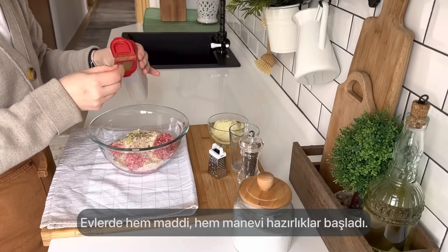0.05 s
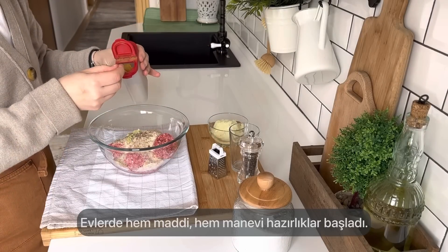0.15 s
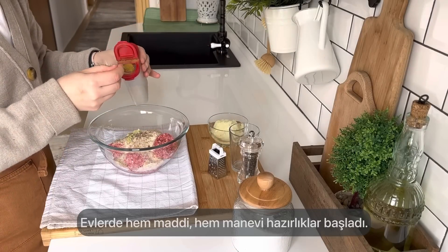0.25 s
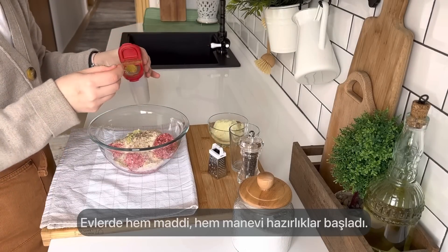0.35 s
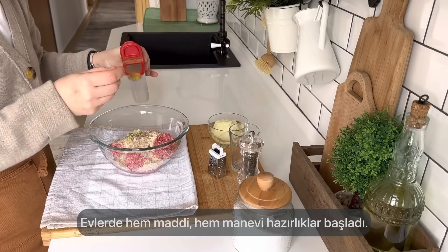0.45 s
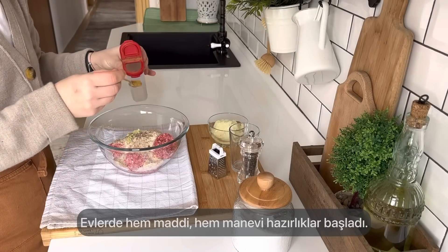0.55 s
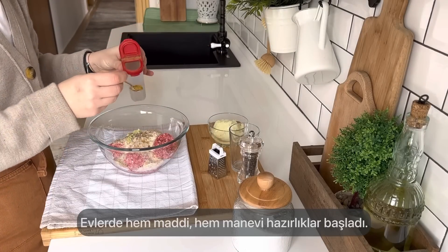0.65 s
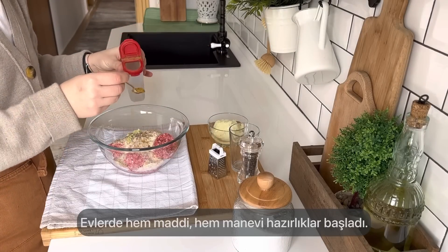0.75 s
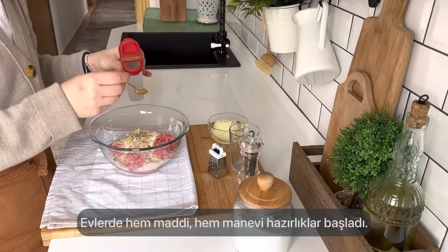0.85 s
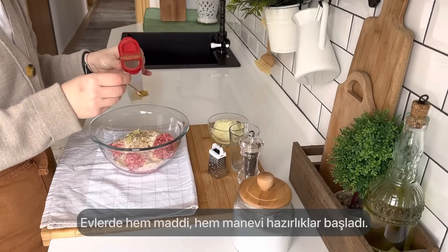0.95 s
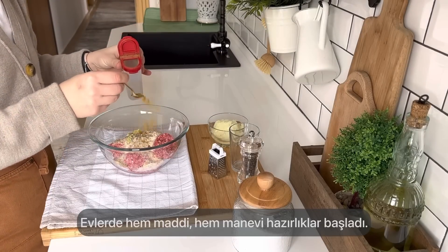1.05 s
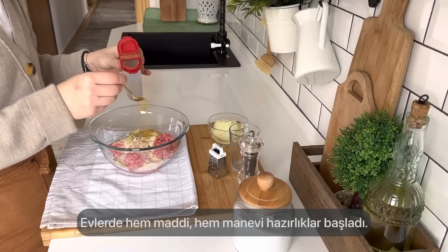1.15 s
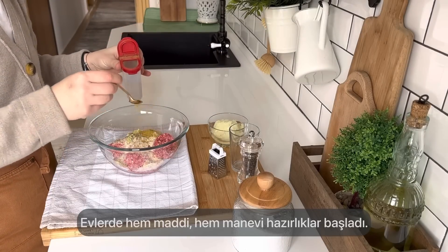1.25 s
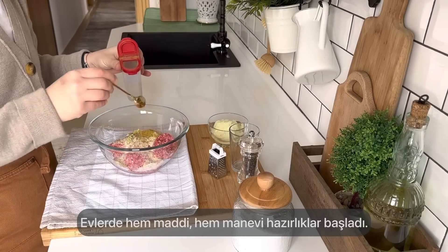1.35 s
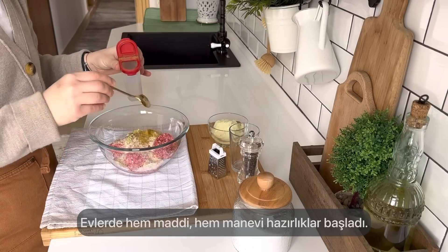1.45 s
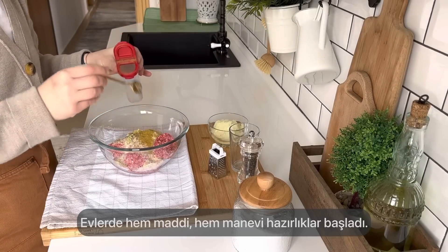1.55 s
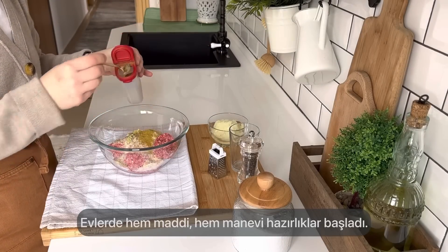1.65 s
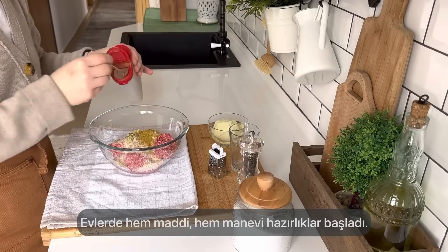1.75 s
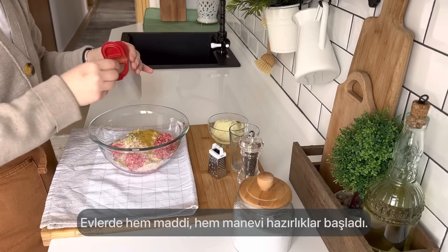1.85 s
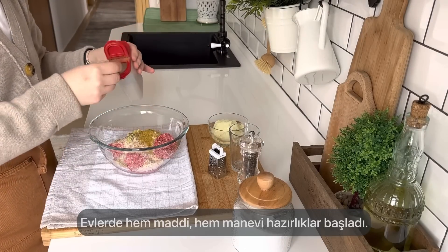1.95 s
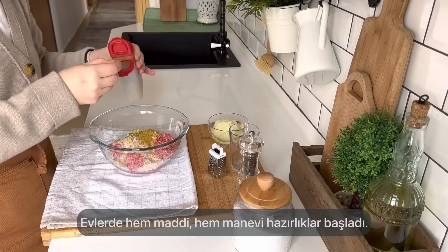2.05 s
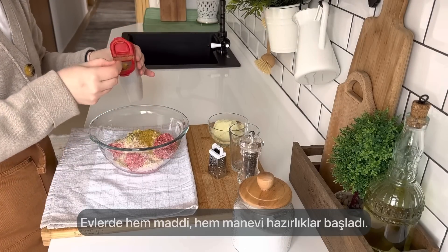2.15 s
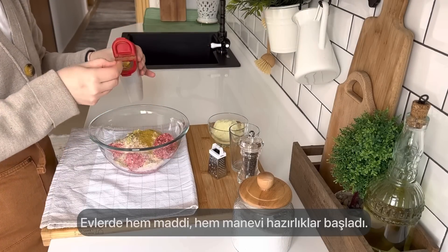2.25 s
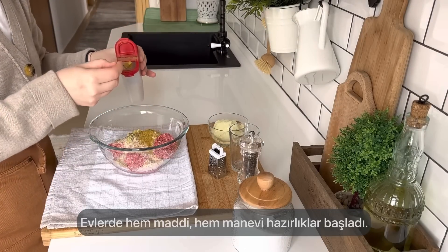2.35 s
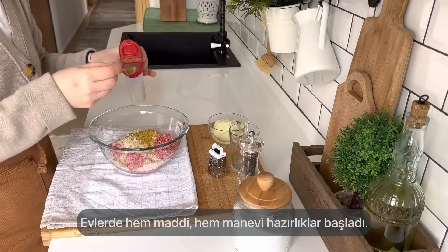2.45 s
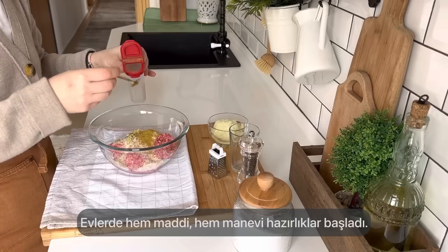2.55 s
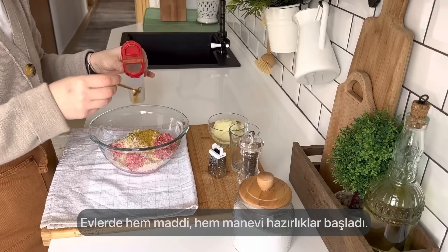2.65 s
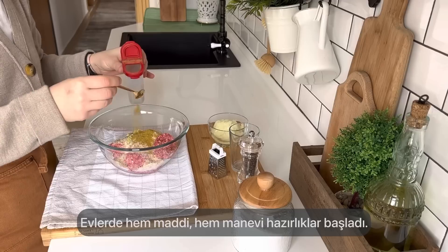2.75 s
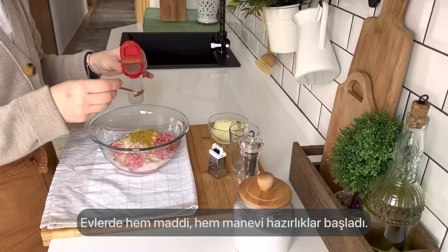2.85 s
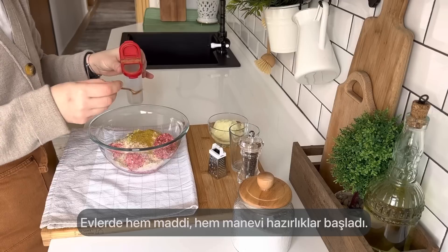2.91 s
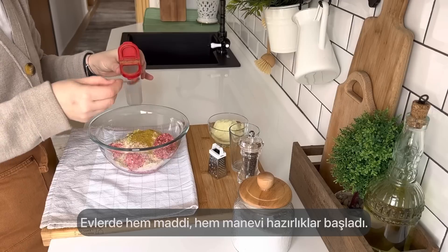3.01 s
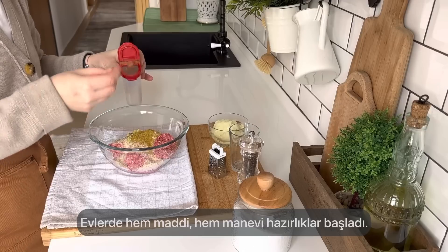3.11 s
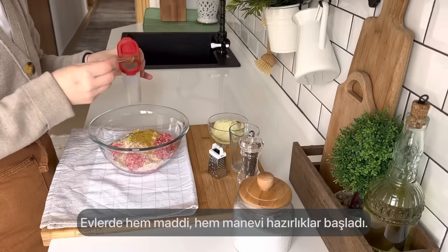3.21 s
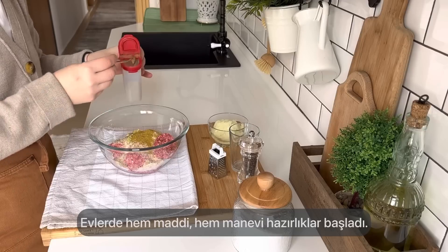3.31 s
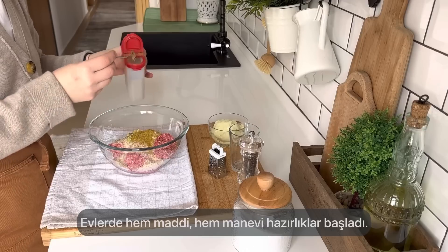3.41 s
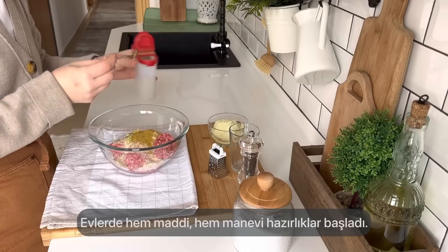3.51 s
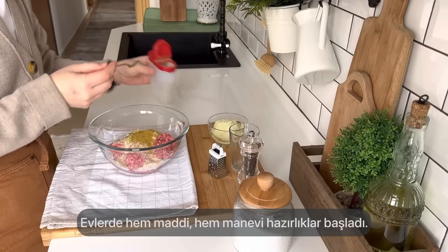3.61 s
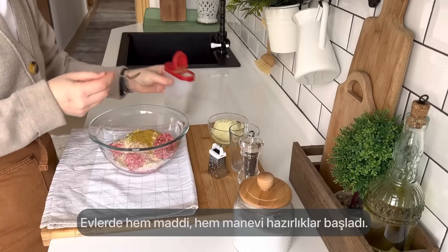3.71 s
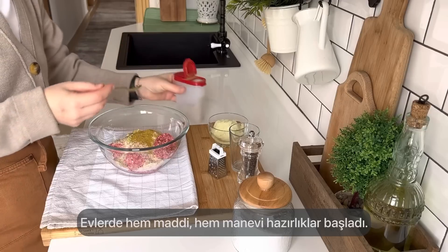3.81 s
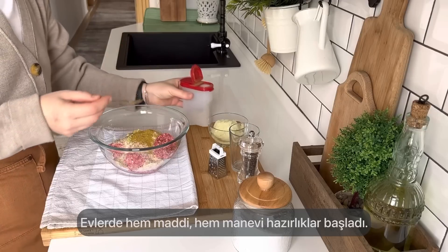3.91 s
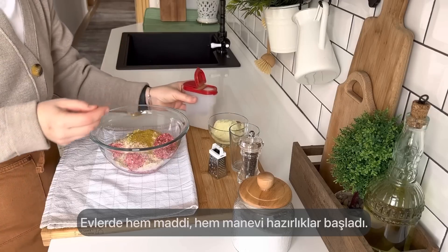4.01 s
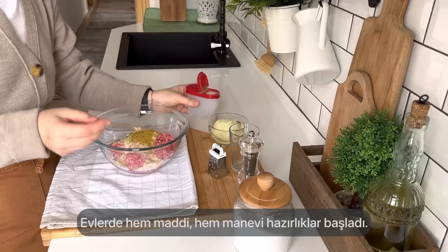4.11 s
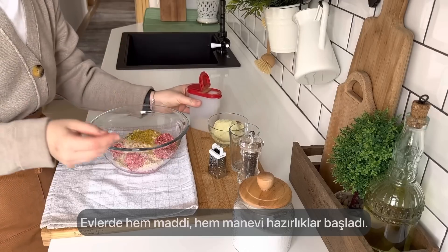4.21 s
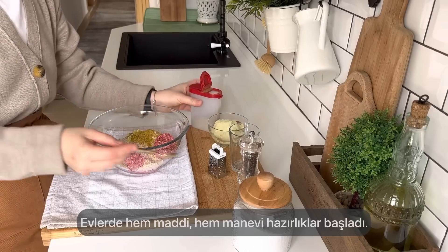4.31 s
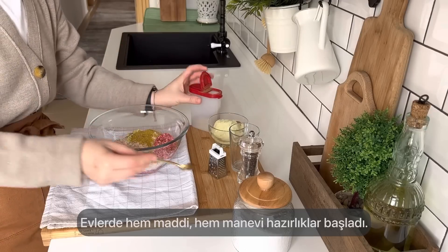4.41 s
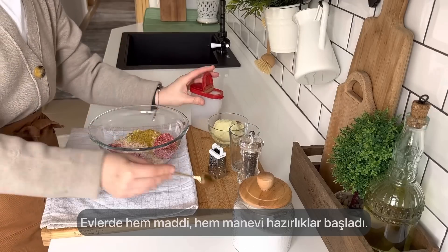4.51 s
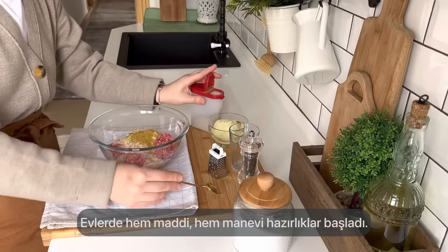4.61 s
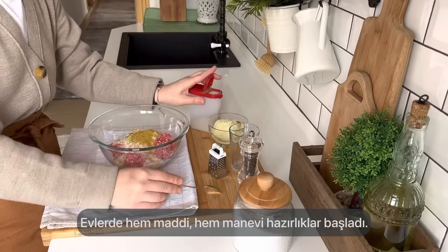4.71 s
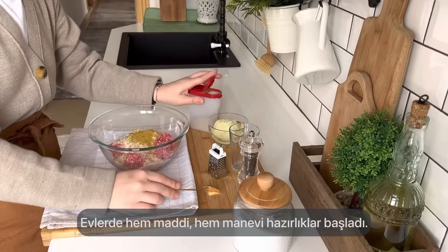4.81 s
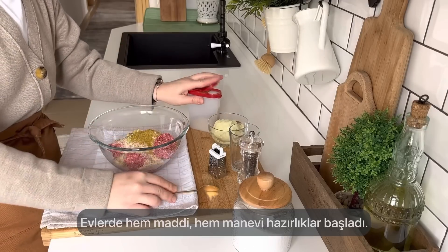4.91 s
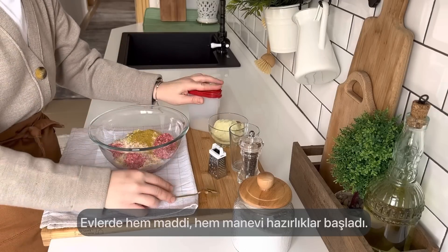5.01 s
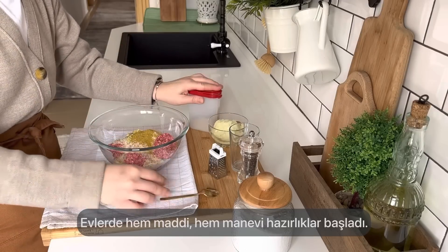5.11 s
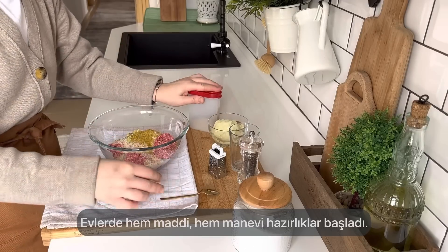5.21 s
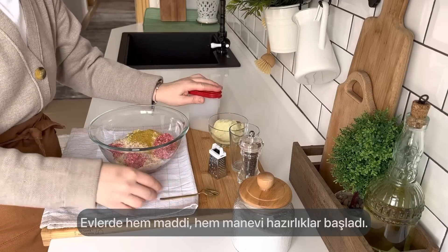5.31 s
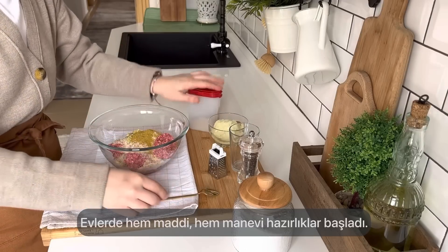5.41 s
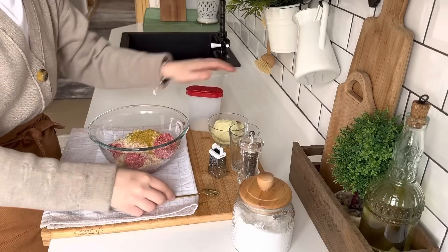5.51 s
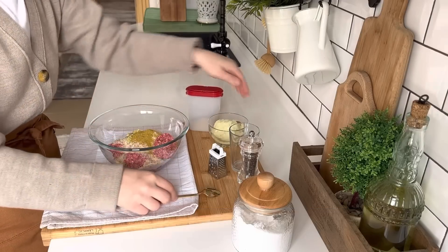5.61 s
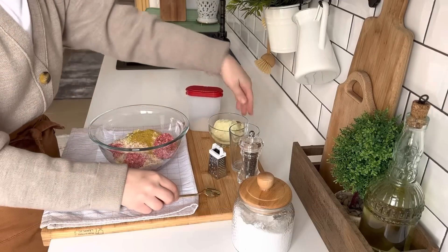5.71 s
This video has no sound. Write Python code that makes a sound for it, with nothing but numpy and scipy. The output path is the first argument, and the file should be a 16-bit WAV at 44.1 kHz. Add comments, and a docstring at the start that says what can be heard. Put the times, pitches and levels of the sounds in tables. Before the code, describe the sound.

Soft spoon taps in a plastic spice jar, a small thump on the counter, then two sharp plastic lid clacks with short room echo over faint hum.

```python
"""Small tiled kitchen, two microphone ports: over a fridge's hum and rumble, soft air and hiss, a spoon taps
in a plastic spice jar, pauses, taps again and rings briefly. The jar is set down, the spoon laid on a board,
the flap flipped shut and pressed home, then something dull shifts on the counter; faint ticks fall between.
Every knock is a sharp push through its object's resonances, followed by the room, whose low modes swell."""
import sys
import numpy as np
from scipy import signal
from scipy.fft import rfft, irfft
from scipy.io import wavfile
from scipy.ndimage import uniform_filter1d

SR = 44100
rng = np.random.default_rng(int(sys.argv[2]) if len(sys.argv) > 2 else 0)


def store_pcm(level_fs):
    """Save levels as 16-bit WAV."""
    pcm = np.round(np.clip(level_fs, -1, 1) * 32767).astype(np.int16)
    wavfile.write(sys.argv[1], SR, np.atleast_2d(pcm).T)


N = 254016
T = np.arange(N) / SR  # s

# In every function below, "blows" lists t/s, push peak level/dB, hardness/dB per octave,
# and "modes" lists what the object rings with: f/Hz, width/Hz, level/dB.


def undb(db):
    """Turn dB into an amplitude factor."""
    return 10 ** (np.asarray(db) / 20)


def unit(x):
    """Scale a signal to an RMS of 1."""
    return x / np.sqrt(np.mean(x ** 2))


def on_log(hz, table, axis=1):
    """Read a column of a table along log frequency."""
    table = np.array(table)
    return np.interp(np.log(hz), np.log(table[:, 0]), table[:, axis])


def ring(x, hz, width_hz):
    """A resonance with gain 1 at its centre."""
    b, a = signal.iirpeak(hz, hz / width_hz, fs=SR)
    return signal.lfilter(b, a, x)


def band(hz, size):
    """Third-octave noise at unit RMS."""
    edges = [hz / 2 ** (1 / 6), hz * 2 ** (1 / 6)]
    sos = signal.butter(2, edges, "band", fs=SR, output="sos")
    return unit(signal.sosfilt(sos, rng.standard_normal(size)))


def walk(rate):
    """Random levels drawn rate times a second and joined by ramps; spread a little under 1."""
    k = int(SR / rate)
    steps = np.repeat(rng.standard_normal(N // k + 1), k)
    return uniform_filter1d(steps, k)[:N]


def stereo(mid, side, share):
    """Left and right from two unrelated signals: share 0 is mono, 1 is fully unrelated."""
    share = np.clip(share, 0, 1)
    return np.array([mid + share * side, mid - share * side]) / np.sqrt(1 + share ** 2)


def colour(x, gain):
    """Weight a signal by a function of frequency."""
    hz = np.arange(1, N // 2 + 2) * SR / N  # starts one bin up, clear of log 0
    return irfft(rfft(x) * gain(hz), N)


def knocks(blows, modes, rattle_db, rattle_s, top_hz, pan_db, room_db, free_s=1, damp_s=1):
    """Each blow is a sharp push ringing the modes, with a short rattle; rows: left, right, share for the room."""
    wetter_db = 0.96  # extra room share for each dB per octave of softer contact
    out = np.zeros((3, N + SR))
    t = T[:SR // 3]
    # the contact lasts too long to drive much above top_hz
    contact = signal.butter(2, top_hz, fs=SR, output="sos")
    lean = undb(pan_db / 2)  # pan_db is left minus right
    mute = np.exp(-np.maximum(t - free_s, 0) / damp_s)
    for s, peak_db, hard_db in blows:
        gains = []
        for k, (hz, width, db) in enumerate(modes):
            # a harder contact tilts the modes brighter about 1 kHz
            tilted = undb(db + hard_db * np.log2(hz / 1000))
            # narrow modes start as loud as wide ones, neighbours swing opposite ways
            gains.append((-1) ** k * tilted * hz / width)

        def strike(x):
            rung = sum(g * ring(x, hz, width) for g, (hz, width, db) in zip(gains, modes))
            return signal.sosfilt(contact, rung)

        push = strike(1. * (t == 0)) * mute
        rattle = strike(undb(rattle_db) * rng.standard_normal(len(t)) * np.exp(-t / rattle_s))
        direct = push + rattle
        to_room = undb(room_db - wetter_db * hard_db) * push
        blow = np.array([lean * direct, direct / lean, to_room])
        i = int(s * SR)
        out[:, i:i + len(t)] += blow * undb(peak_db) / np.abs(push).max()
    return out[:, :N]


def spoon_taps():
    """The spoon knocks the jar's plastic wall, whose broad modes die at once."""
    blows = [(1.732, -49.5, -2), (1.738, -49, -11.5), (1.748, -50.5, -2.5), (1.754, -65, 3),
             (1.762, -51, -4.5), (1.790, -29.5, 3), (1.793, -27.5, 1), (1.800, -40, -7.5),
             (1.816, -47, -8.5), (1.834, -45.5, -6.5), (1.857, -43.5, -6.5), (3.024, -38.5, -6),
             (3.257, -36.5, -0.5), (3.278, -37, -4.5), (3.296, -50.5, -2)]
    modes = [(408, 117, 7), (610, 202, 9.5), (1010, 366, 10), (1680, 760, 9), (3010, 690, -3),
             (4870, 1200, -10.5), (5870, 1500, -8), (9600, 8300, -6.5)]
    return knocks(blows, modes, -15.5, 0.0055, 19845, pan_db=5.5, room_db=-6.5)


def spoon_ring():
    """The spoon's narrow modes ring freely, then the fingers mute them; very little room on it."""
    blows = [(3.024, -33, 0)]
    modes = [(565, 14, -9), (682, 4, 1), (1817, 9, -3), (3350, 12, -28), (5225, 16, -41), (7354, 26, -47)]
    return knocks(blows, modes, -43, 0.00039, 15000, pan_db=-6, room_db=-20, free_s=.068, damp_s=.012)


def jar_down():
    """The jar's base lands and rings its low, broad modes."""
    blows = [(4.117, -24, 0.44), (4.128, -35, -2.6)]
    modes = [(328, 160, -2), (597, 91, -6.5), (940, 340, -8.5), (1250, 440, -7), (1990, 990, -15.5),
             (2970, 1300, -27), (8000, 21000, -39.5)]
    return knocks(blows, modes, -12.5, 0.0038, 9300, pan_db=-3.0, room_db=-4.5)


def spoon_down():
    """The spoon is laid down and rings the board."""
    blows = [(4.6815, -27, 0)]
    modes = [(320, 120, 9), (467, 74, 5.5), (798, 300, 2), (1600, 320, 4.5), (2750, 720, 0),
             (4200, 1200, -7), (5650, 2700, -19.5)]
    return knocks(blows, modes, -22.5, 0.0021, 6500, pan_db=2.0, room_db=-9.5)


def flap_shut():
    """The flap flips shut: the loudest crack, ringing the flap's own modes."""
    blows = [(4.9445, -6, 0)]
    modes = [(300, 95, 0.5), (546, 190, 4.5), (780, 200, 0.5), (1000, 260, -4.5), (1440, 440, -6),
             (2040, 370, -10), (2790, 1460, -6), (5270, 3000, -7), (10110, 3300, -10), (13300, 8000, -13.5)]
    return knocks(blows, modes, -12, 0.0035, 15000, pan_db=-3, room_db=-8.5)


def lid_pressed():
    """The lid is pressed home and rings its own modes."""
    blows = [(5.1908, -9, 0.0053)]
    modes = [(336, 95, -5), (530, 130, 5), (622.4, 170, 3.5), (960, 280, -7.5), (1560, 470, -3),
             (2040, 580, -6.5), (2630, 740, -8.5), (4880, 5200, -7), (10110, 3500, -11),
             (13300, 8000, -17.5)]
    return knocks(blows, modes, -12.5, 0.0036, 14000, pan_db=-4.5, room_db=-9.5)


def thuds():
    """Something dull shifts and rings the counter's low modes."""
    blows = [(4.526, -43, 1.5), (5.5168, -31, 2), (5.531, -43, -12.5), (5.5945, -38, -2), (5.6035, -39, -4),
             (5.651, -41.5, -6), (5.7055, -43, -4)]
    modes = [(265, 60, -4), (362, 57, -2), (500, 59, -3.5), (610, 130, -6), (900, 220, -17),
             (1680, 550, -26.5), (2800, 1300, -38)]
    return knocks(blows, modes, -29, 0.013, 3500, pan_db=-4.5, room_db=-16)


def faint_ticks():
    """Very quiet ticks in the treble, with much of the room on them."""
    blows = [(4.479, -60, 1.5), (4.524, -62, -1), (5.358, -60, -1), (5.425, -53, 10)]
    modes = [(2800, 500, 0), (4300, 1400, -4), (9500, 7800, -0.5)]
    return knocks(blows, modes, -20.0, 0.0024, 19845, pan_db=0.0, room_db=-1)


def room_booms():
    """The room's low modes swell and fade, a little stronger on the right."""
    # swells of the low modes: t/s, peak level before the lean to the right/dB, f/Hz, length/s
    swells = [(2.693, -42.5, 108.7, 0.16), (4.133, -31.5, 113, 0.063), (4.929, -31.5, 123.3, 0.11),
              (4.94, -33, 147.4, 0.057), (5.181, -33.5, 115.3, 0.085), (5.179, -37, 59.8, 0.1),
              (5.519, -42, 117, 0.047)]
    out = np.zeros(N)
    for s, db, hz, length in swells:
        swell = np.sin(np.pi * np.clip((T - s) / length, 0, 1)) ** 2
        out += undb(db) * swell * np.sin(2 * np.pi * hz * (T - s))
    return out * undb([[-1.5], [1.5]])


def standing(t):
    """Slowly fading low tones that every knock stirs up."""
    # standing waves between walls, counter and shelves: f/Hz, t60/s, level/dB, left minus right/dB
    waves = [(270, 0.16, -42.5, 4), (339.5, .45, -40.5, 5), (406, .35, -49.5, -1.5),
             (497.7, 0.16, -47.5, -4.5), (569, 0.31, -44, -4), (624, .45, -48.5, 0.5),
             (697, 0.26, -44, 0.5), (757, 0.12, -44, 0), (880, .4, -44, 2.5), (1209, .3, -46, -2.5)]
    onset = np.clip(t / 0.004, 0, 1)
    out = 0
    for hz, t60, db, lean_db in waves:
        level = undb(db + lean_db * np.array([[.5], [-.5]]))
        out = out + level * 10 ** (-3 * t / t60) * np.sin(2 * np.pi * hz * t) * onset
    return out


def kitchen(dry):
    """Tiled walls return a dense tail: near surfaces die fast, the room lingers and its top fades soonest."""
    # room tail: f/Hz, t60/s, level/dB, side share/0-1
    room = [(58.7, 0.38, -1, 0.4), (118.5, 0.48, 21, 0.2), (280.5, 0.71, 12, 0.2), (450, 0.58, 9.5, 0),
            (744, 0.56, 14, 1), (1100, .45, 13.5, 1), (1920, 0.39, 14, 0.4), (3300, .38, 14, .9),
            (5500, 0.38, 14.5, 1), (9070, 0.28, 15.5, 0.5), (14000, 0.29, 7, 0.05)]
    patchy_db, patch_rate = 2, 70  # dB, per s: bands swell unevenly as separate echoes arrive
    t = T[:SR]
    tail = standing(t)
    for hz in 50 * 2 ** np.arange(0, 8.4, 1 / 3):
        lingering = 10 ** (-3 * t / on_log(hz, room))
        near = 1.1 * np.exp(-t / 0.026)
        fade = (lingering + near) * np.clip(t / 0.001, 0, 1)
        fade = fade * undb(patchy_db * walk(patch_rate)[:len(t)])
        pair = stereo(band(hz, len(t)), band(hz, len(t)), on_log(hz, room, axis=3))
        # the level counts the tail's whole energy in its band
        share = np.sqrt(hz / 2 / SR / np.sum(fade ** 2))
        tail = tail + share * undb(on_log(hz, room, axis=2)) * fade * pair
    return signal.fftconvolve(dry[None], tail, axes=1)[:, :N]


def ports(x):
    """The two microphone ports differ in level and phase across frequency."""
    # level between the ports: f/Hz, left minus right/dB
    port_db = [(60, -4), (110, -6), (200, -0.5), (380, 3), (700, -2.5), (1290, 1), (2380, 1), (4400, 5.5),
               (8120, 6.5), (11500, -1), (15000, 1)]
    # phase between the ports: f/Hz, left leads/rad
    port_phase = [(20, 0), (300, .3), (600, -.5), (1550, -1.1), (1980, .6), (3360, 1.4), (4310, -1.5),
                  (5860, .7), (7920, 1.4), (10300, -1.2), (14000, -.8)]

    def lean(hz):
        return undb(on_log(hz, port_db) / 2) * np.exp(.5j * on_log(hz, port_phase))

    return np.array([colour(x[0], lean), colour(x[1], lambda hz: 1 / lean(hz))])


def fridge():
    """A mains hum (sine plus narrow noise) and a low rumble, a little stronger on the right."""
    # levels over time before the lean to the right: t/s, hum level/dB, rumble level/dB
    levels = [(0, -57, -58.5), (1.5, -56, -56), (2.5, -57, -52.5), (3.5, -57.5, -60), (4.5, -56.5, -55),
              (5.76, -52, -57)]
    hum_hz, hum_width_hz, rumble_hz, rumble_width_hz = 99.4, 6.7, 46, 13
    s, hum_db, rumble_db = np.transpose(levels)
    narrow = ring(ring(rng.standard_normal(N), hum_hz, hum_width_hz), hum_hz, hum_width_hz)
    hum = np.sin(2 * np.pi * hum_hz * T) + .5 * unit(narrow)
    rumble = ring(ring(rng.standard_normal(N), rumble_hz, rumble_width_hz), rumble_hz, rumble_width_hz)
    lean_db = np.array([[1], [-1]])  # left, right
    hum_gain = undb(np.interp(T, s, hum_db) - 1.9 * lean_db)
    rumble_gain = undb(np.interp(T, s, rumble_db) - 0.66 * lean_db)
    return unit(hum) * hum_gain + unit(rumble) * rumble_gain


def air(spectrum, flicker_db, rate):
    """Noise in bands that flicker a little, more alike left and right in the bass."""
    # width of the noise: f/Hz, side share/0-1
    side_share = [(30, .05), (120, 0.43), (400, 0.73), (1500, 0.93), (5000, 0.89), (12000, 1)]
    out = 0
    for hz in 25 * 2 ** np.arange(0, 9.4, 1 / 3):
        pair = stereo(band(hz, N), band(hz, N), on_log(hz, side_share))
        out = out + np.sqrt(hz) * undb(flicker_db * walk(rate)) * pair
    return colour(out, lambda hz: undb(on_log(hz, spectrum)))


def hush():
    """Distant air in the house over the microphone's hiss."""
    # spectrum of the distant air: f/Hz, relative level/dB per Hz
    air_spectrum = [(15, -54.5), (30, -19), (60, -0.5), (78, -5), (92, -9), (128, -7), (150, -15),
                    (186, -14.5), (229, -22.5), (267, -14), (562, -22), (856, -24.5), (1080, -29.5),
                    (2300, -37.5), (3100, -75)]
    # loudness of the distant air: t/s, level/dB
    air_level = [(0, -51), (.15, -54.5), (1.6, -55), (2.8, -56), (4.399, -57), (5.76, -54)]
    # spectrum of the microphone hiss: f/Hz, relative level/dB per Hz
    hiss_spectrum = [(1410, -48.5), (2400, -5), (2530, -3.5), (3200, 0.5), (3990, -6.5), (5120, -11),
                     (6120, -5), (6880, -1), (7270, -0.5), (7800, -4), (8370, -14.5), (9780, -6),
                     (11400, -23.5), (13900, -16.5), (15500, -22.5)]
    s, db = np.transpose(air_level)
    distant = unit(air(air_spectrum, 0.59, 3.3)) * undb(np.interp(T, s, db))
    hiss = unit(air(hiss_spectrum, 0.58, 22)) * undb(-77.5)
    return distant + hiss


def scene():
    """Knocks reach both ports directly and through the room, over the steady background."""
    dry = (spoon_taps() + spoon_ring() + jar_down() + spoon_down()
           + flap_shut() + lid_pressed() + thuds() + faint_ticks())
    return ports(dry[:2] + kitchen(dry[2])) + room_booms() + fridge() + hush()


def record(dry):
    """The recorder drops the deepest bass (below 34 Hz) and cuts the top steeply (above 16 kHz)."""
    low_cut = signal.butter(4, 34, "high", fs=SR, output="sos")
    top_cut = signal.ellip(8, .2, 70, 16000, fs=SR, output="sos")
    return signal.sosfilt(top_cut, signal.sosfilt(low_cut, dry))


dry = scene()
out = record(dry)
store_pcm(out)
```